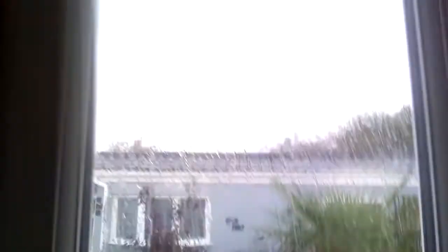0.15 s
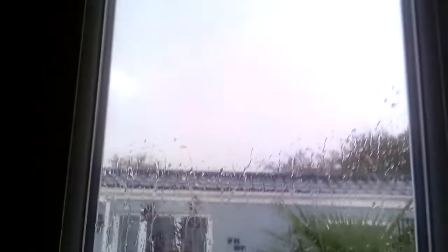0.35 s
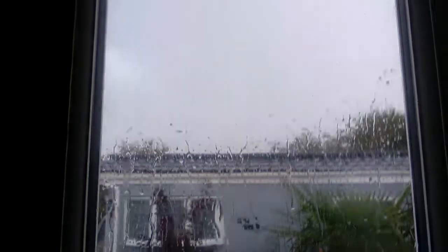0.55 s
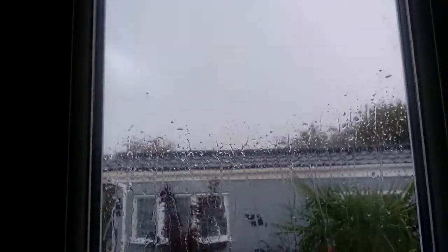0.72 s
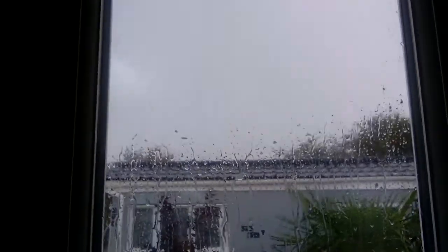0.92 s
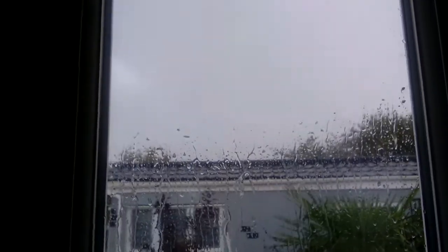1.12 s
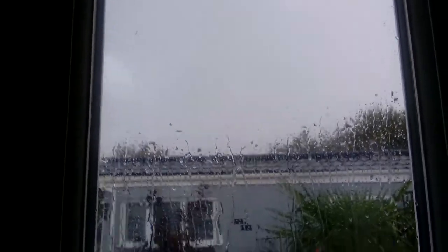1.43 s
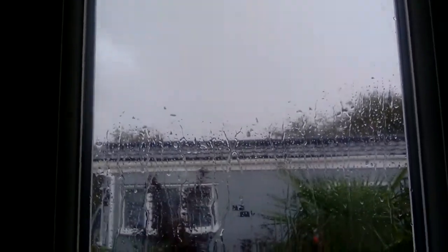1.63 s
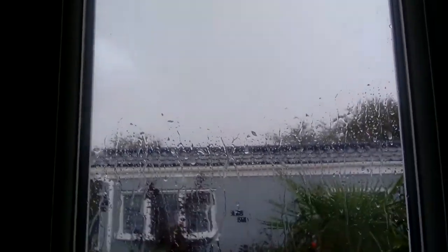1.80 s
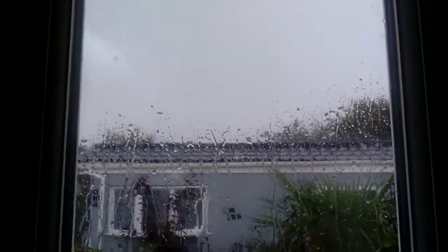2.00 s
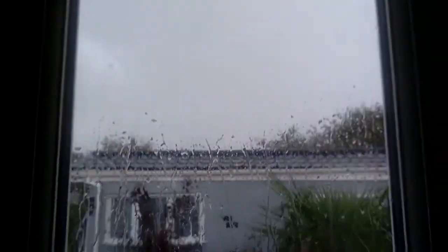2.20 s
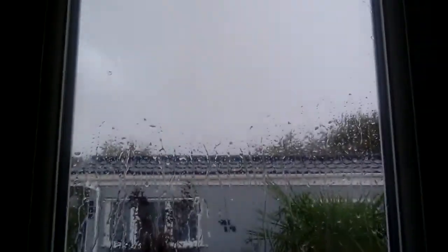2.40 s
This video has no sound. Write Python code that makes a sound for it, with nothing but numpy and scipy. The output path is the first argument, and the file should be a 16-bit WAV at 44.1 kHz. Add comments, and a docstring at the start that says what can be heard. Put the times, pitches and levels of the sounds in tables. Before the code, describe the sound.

Rain taps on a window pane, heard indoors, with an early knock and late close clicks.

```python
"""Indoors, close behind a shut window, in heavy rain.
Drops patter dully on the pane, each a short ring, and a few tap harder on glass and sill.
Near the start a knock rattles and scuffs the frame; soft low thumps follow.
At the end tiny hard contacts crackle as sharp ticks right beside the microphone."""
import sys
import numpy as np
from scipy import signal
from scipy.fft import rfft, irfft
from scipy.io import wavfile

SR = 44100
rng = np.random.default_rng(int(sys.argv[2]) if len(sys.argv) > 2 else 0)


def wrap_up_sound(samples):
    """Save the sound to the file named by the first command line argument, as 16-bit audio."""
    columns = np.atleast_2d(samples).T
    # keep every value between -1 and 1, then stretch to whole-number steps
    tamed = np.clip(columns, -1, 1)
    steps = np.round(tamed * 32767).astype(np.int16)
    wavfile.write(sys.argv[1], SR, steps)


N = 112454
T = np.arange(N) / SR
FREQS_HZ = np.maximum(np.arange(N // 2 + 1) * SR / N, 1)
ROOM_T60_S, ROOM_BUILD_S = 0.58, 0.0027   # t60 is the time a sound takes to fade by 60 dB

# how loud the dull patter is over time: t/s, level/dB
PATTER_LEVEL = [(0, -45.5), (.3, -46.5), (.7, -55), (1.25, -55.5), (1.45, -49), (1.8, -52), (1.85, -49),
                (2.1, -46.5), (2.3, -55.5), (2.54, -56.5)]
# tone of a drop heard through the glass: f/Hz, level/dB
PANE_TONE = [(40, -7), (130, 0.5), (210, -7), (285, 0), (390, -9), (490, -17.5), (680, -6.5), (930, -10),
             (1150, -18), (1500, -22), (4000, -59.5)]
# how loud the brighter spatter is over time: t/s, level/dB
SPATTER_LEVEL = [(0, -58), (.2, -57.5), (.4, -70), (1.2, -73.5), (1.5, -66), (1.8, -71), (1.85, -65),
                 (2.08, -59.5), (2.54, -71)]
# tone of that spatter: f/Hz, level/dB
SPATTER_TONE = [(700, -22), (1200, 2.5), (1600, -1), (2900, -9), (4800, -25), (10000, -38)]

def rain():
    """Rain hits the pane: a dull patter with a finer spatter above it."""
    dull = drops(PANE_TONE, per_s=250, t60=0.093, low_hz=131, high_hz=1148, wash_db=-3)
    fine = drops(SPATTER_TONE, per_s=420, t60=0.03, low_hz=1113, high_hz=4415, wash_db=1)
    dull_gain = from_db(np.interp(T, *np.transpose(PATTER_LEVEL)))
    fine_gain = from_db(np.interp(T, *np.transpose(SPATTER_LEVEL)))
    return dull * dull_gain + fine * fine_gain


def drops(tone, per_s, t60, low_hz, high_hz, wash_db, spread_db=3):
    """Random drops ring briefly, each at its own pitch, over the wash of countless far ones."""
    out = np.zeros(N)
    t, fade = T[:SR // 8], decay(t60)[:SR // 8]
    wash = noise(tone)
    for when, pitch, chance in rng.random((int(per_s * N / SR), 3)):
        hz = low_hz * (high_hz / low_hz) ** pitch
        size = min(-np.log(1 - chance), np.pi)   # many small drops, few big ones
        gain = np.sqrt(hz) * from_db(spread_db * size)
        add(out, when * N / SR, gain * np.sin(2 * np.pi * hz * t) * fade)
    return rms_one(colour(out, tone) + from_db(wash_db) * wash)


# harder drops and small taps on the frame: t/s, level/dB, f/Hz, width/octaves
HARD_TAPS = [(0.001, -34, 335, 0.4), (0.076, -52, 5770, 0.074), (0.0799, -30, 1230, 0.34),
             (.0805, -32, 2750, 0.33), (0.0861, -26.5, 1210, 0.45), (.108, -37, 690, 0.11),
             (0.2063, -24.5, 3200, 0.34), (0.2365, -18.5, 2250, 0.37), (0.529, -41, 269, 0.16),
             (0.572, -63.5, 4140, 0.048), (.588, -57, 1980, 0.094), (0.649, -34.5, 3650, 0.2),
             (0.815, -44.5, 1210, 0.32), (1.338, -43, 272, 0.082), (1.406, -42.5, 930, 0.28),
             (1.503, -37, 750, 0.45), (1.8318, -36.5, 900, 0.68), (1.986, -51, 3450, 0.14),
             (2.0532, -31.5, 1680, 0.34), (2.0537, -41.5, 5900, 0.23)]

def taps(rise_s=0.0013):
    """Each hard drop rings a cluster of close notes around its own pitch."""
    out = np.zeros(N)
    for s, db, hz, width in HARD_TAPS:
        band = 1 / (1 + (np.log2(FREQS_HZ / hz) / width) ** 4)
        cluster = irfft(rfft(rng.standard_normal(N)) * band, N)
        t60 = 0.009 * np.sqrt(1000 / hz) / width   # lower and narrower clusters ring longer
        shape = decay(t60) * rise(rise_s)
        ring = cluster * shape
        add(out, s, from_db(db) * ring * np.linalg.norm(shape) / np.linalg.norm(ring))
    return room(out, echo_db=-10.5)


# the knock and its bounces: t/s, body level/dB, crack level/dB
KNOCK_HITS = [(0.2454, -7.5, -15.5), (0.2497, -21, -19.5), (0.2544, -20, -24), (0.2633, -31, -31),
              (0.2675, -14.5, -21), (0.2758, -28.5, -31.5)]
# notes the frame rings with: f/Hz, level/dB, t60/s
FRAME_NOTES = [(57, 3.5, 0.1), (98, -8.5, 0.07), (128.3, -14, 0.12), (191.6, -11.5, 0.099),
               (265.6, -15, 0.11), (383.5, -10.5, 0.05), (868, -13.5, 0.038), (1328, -20, 0.053)]
# tone of each hit's crack: f/Hz, level/dB
CRACK_TONE = [(300, 2), (1900, -8), (5600, -20), (7500, -39.5), (14000, -54)]

def knock(crack_t60_s=0.021, rise_s=0.00032):
    """A heavy hit and its bounces ring the frame, each with a short crack."""
    out = np.zeros(N)
    body = sum((-1) ** k * from_db(db) * np.sin(2 * np.pi * hz * T) * decay(t60)
               for k, (hz, db, t60) in enumerate(FRAME_NOTES))
    for s, body_db, crack_db in KNOCK_HITS:
        crack = from_db(crack_db) * noise(CRACK_TONE) * decay(crack_t60_s)
        add(out, s, (from_db(body_db) * body + crack) * rise(rise_s))
    return room(out, echo_db=-17.5)


# single ticks: t/s, level/dB, brightness/(dB per octave), low-note level/dB
CLOSE_TICKS = [(2.2515, -3, 9, -3.5), (2.252, -11, -16, 7.5), (2.2552, -6.5, 5.5, 0), (2.2905, -28, 4, -6),
               (2.489, -17, -4, -16), (2.4911, -18.5, -6, -15.5), (2.497, -18, -4, -23),
               (2.4993, -25, -9, -12), (2.5038, -27, -8, -18), (2.5067, -23, -7, -15),
               (2.5183, -19, -5, -16), (2.52, -10.5, -9, -2)]
# quick runs of ticks: t/s, level/dB, brightness/(dB per octave), low-note level/dB
TICK_RUNS = [(2.2574, -12.5, 6.5, -3.5), (2.5206, -14.5, -13.5, -7)]
# tone of the ticks as the room sends them back: f/Hz, level/dB
TICK_ECHO_TONE = [(2500, -1.5), (7500, -7.5), (13000, -14.5)]

def ticks(run_length=8, gap_s=0.00115, loss_db=1.5, echo_db=-24.5):
    """Sharp close ticks, some running on in a dying chatter, leave a bright echo in the room."""
    out = np.zeros(N)
    for s, db, bright, low_db in CLOSE_TICKS:
        add(out, s, tick(db, bright, low_db))
    for s, db, bright, low_db in TICK_RUNS:
        for k in range(run_length):   # each repeat is softer and duller
            when = s + gap_s * (k + rng.normal(0, .12))
            add(out, when, tick(db - loss_db * k, bright - k / 2, low_db))
    fade = decay(ROOM_T60_S) ** 2
    echo_energy = np.abs(signal.fftconvolve(out ** 2, fade / fade.sum())[:N])
    return out + from_db(echo_db) * np.sqrt(echo_energy) * noise(TICK_ECHO_TONE)


# high notes of a tick: f/Hz, level/dB, t60/s
TICK_HIGH_NOTES = [(5176, -7.5, 0.0044), (5710, -2.5, 0.0036), (6440, 0.5, 0.0034), (8120, -3.5, 0.003),
                   (10480, -9.5, 0.0017)]
# low notes, strongest in the harder ticks: f/Hz, level/dB, t60/s
TICK_LOW_NOTES = [(1770, -19.5, 0.0064), (3050, -8, 0.0059), (3580, -6.5, 0.0057)]

def tick(db, bright, low_db, edge_hz=4850):
    """One tiny hard contact: a thin snap of high notes over a share of low ones."""
    pivot_hz = TICK_HIGH_NOTES[1][0]
    tilted = [(hz, level + bright * np.log2(hz / pivot_hz), t60) for hz, level, t60 in TICK_HIGH_NOTES]
    snap = signal.sosfilt(signal.butter(8, edge_hz, "high", fs=SR, output="sos"), tick_ring(tilted))
    return from_db(db) * (snap + from_db(low_db) * tick_ring(TICK_LOW_NOTES))


def tick_ring(notes, rise_cycles=2.04):
    """Notes swell over a few cycles and die within milliseconds, never twice quite alike."""
    t, out = T[:SR // 40], 0
    for hz, db, t60 in notes:
        swell = 1 - np.exp(-(t * hz / rise_cycles) ** 2)
        gain = from_db(db + rng.normal())
        wave = np.sin(2 * np.pi * hz * rng.normal(1, 0.026) * t)
        out = out + gain * swell * decay(t60)[:len(t)] * wave
    return out


# soft low thumps: t/s, level/dB, f/Hz
SOFT_THUMPS = [(.333, -24.5, 66.6), (.368, -31.5, 84), (0.927, -40, 120), (1.163, -30.5, 64),
               (1.591, -30.5, 68), (1.735, -34.5, 86), (1.858, -30.5, 55.6), (1.912, -32.5, 64.6),
               (1.979, -31.5, 64.3), (2.073, -36.5, 51.3)]
# tone of the rumble after a thump: f/Hz, level/dB
RUMBLE_TONE = [(28, -9.5), (48, 14), (110, -4), (180, -1), (700, -64.5)]

def thumps(rise_s=0.0023, t60=0.058, rumble_db=-8.5, rumble_t60_s=0.34):
    """Each soft push swings for a cycle or two and leaves a little rumble."""
    out = np.zeros(N)
    swell = rise(rise_s)
    shape = swell * decay(t60)
    for s, db, hz in SOFT_THUMPS:
        swing = np.sin(2 * np.pi * hz * T) * shape / shape.max()
        rumble = from_db(rumble_db) * noise(RUMBLE_TONE) * swell * decay(rumble_t60_s)
        add(out, s, from_db(db) * (swing + rumble))
    return out


# dry scuffs of the frame: t/s, length/s, level/dB
FRAME_SCUFFS = [(.079, 0.0056, -49), (0.208, 0.0022, -39.5), (0.199, .074, -53.5), (.2625, .0018, -53),
                (0.2767, 0.0016, -45), (.882, 0.0057, -69.5), (0.917, 0.0067, -71)]
# tone of the rubbing: f/Hz, level/dB
SCUFF_TONE = [(2500, 4), (5800, 4.5), (8000, -7.5), (11500, 2.5), (14500, -6)]

def scuffs(edge_s=0.001):
    """The frame rubs briefly before and during the knock, and faintly twice later."""
    level = np.zeros(N)
    for s, length, db in FRAME_SCUFFS:
        inside_s = np.minimum(T - s, s + length - T)
        level += from_db(db) * np.clip(inside_s / edge_s + .5, 0, 1)
    return room(level * noise(SCUFF_TONE), echo_db=-17.5)


def hiss(db=-81):
    """The microphone's own faint hiss."""
    return from_db(db) * rng.standard_normal(N)


def room(x, echo_db):
    """The sound plus the room's smooth, dying echo."""
    tail = rng.standard_normal(N) * decay(ROOM_T60_S) * rise(ROOM_BUILD_S)
    return x + from_db(echo_db) * signal.fftconvolve(x, tail / np.linalg.norm(tail))[:N]


def from_db(db):
    """Turn decibels into a gain."""
    return 10 ** (np.asarray(db) / 20)


def rms_one(x):
    """Scale x to an average strength (rms) of 1."""
    return x / np.sqrt(np.mean(x ** 2) + 1e-20)


def colour(x, tone):
    """Shape the lows and highs of x by a tone table; rms 1."""
    hz, db = np.transpose(tone)
    gain = from_db(np.interp(np.log(FREQS_HZ), np.log(hz), db))
    return rms_one(irfft(rfft(x) * gain, N))


def noise(tone):
    """Noise with the given tone; rms 1."""
    return colour(rng.standard_normal(N), tone)


def rise(seconds):
    """Gain that climbs from 0 towards 1."""
    return 1 - np.exp(-T / seconds)


def decay(t60):
    """Gain that falls 60 dB in t60 seconds."""
    return np.exp(-np.minimum(np.log(1000) * T / t60, 80))


def add(out, s, x):
    """Mix x into out from time s."""
    i = int(np.clip(s * SR, 0, N - 1))
    out[i:i + len(x)] += x[:N - i]


def scene():
    """Everything at the window, in one channel."""
    return (rain() + taps() + scuffs() + knock() + thumps() + ticks() + hiss())[None]


def record(dry):
    """The microphone loses the deepest bass, and the highest treble is cut."""
    low_hz, high_hz = 36, 14450
    thin = signal.sosfilt(signal.butter(4, low_hz, "high", fs=SR, output="sos"), dry)
    return signal.sosfilt(signal.ellip(10, .3, 80, high_hz, fs=SR, output="sos"), thin)


dry = scene()
out = record(dry)
wrap_up_sound(out)
```